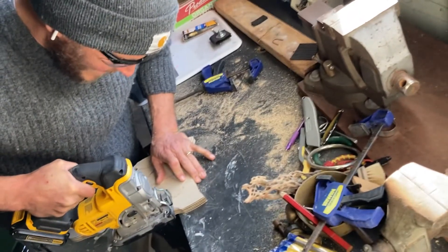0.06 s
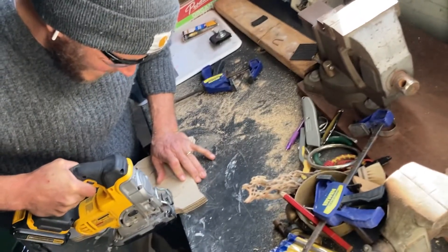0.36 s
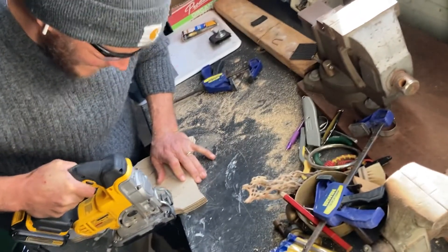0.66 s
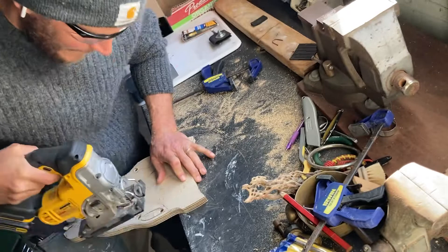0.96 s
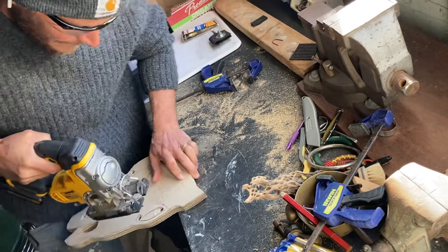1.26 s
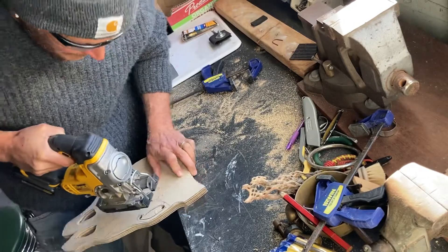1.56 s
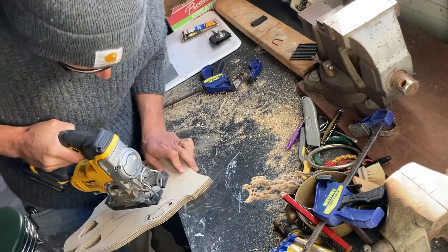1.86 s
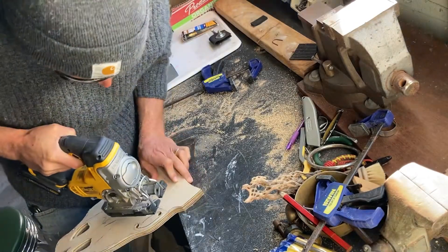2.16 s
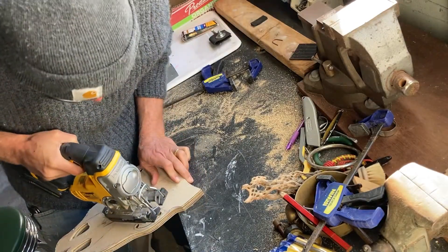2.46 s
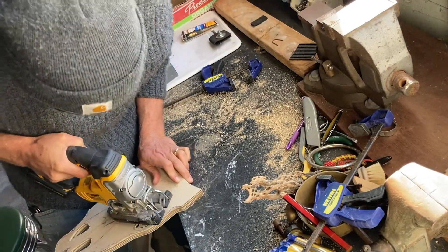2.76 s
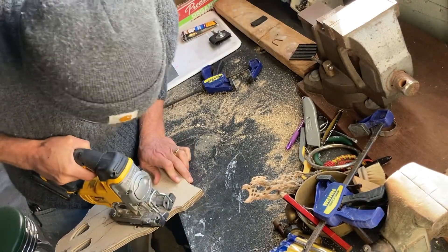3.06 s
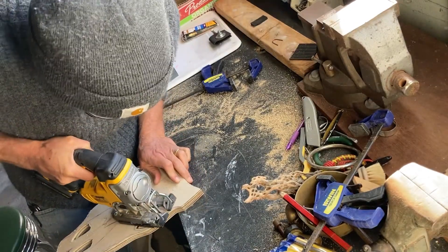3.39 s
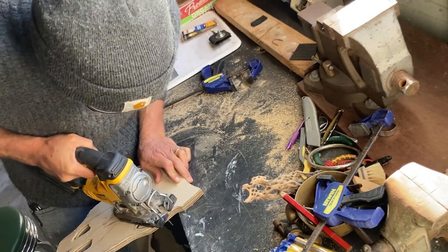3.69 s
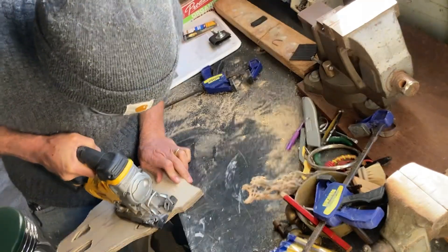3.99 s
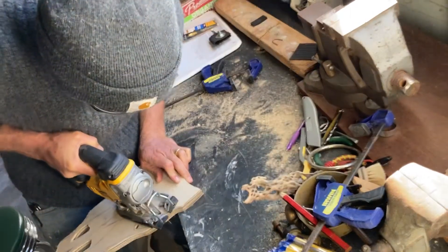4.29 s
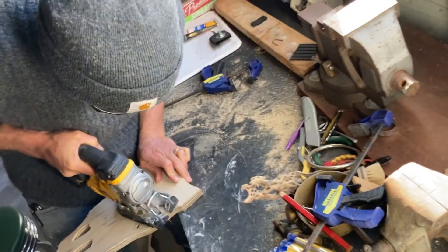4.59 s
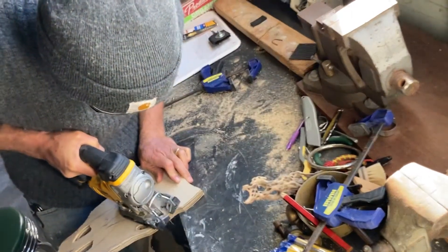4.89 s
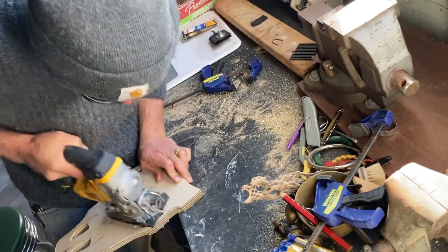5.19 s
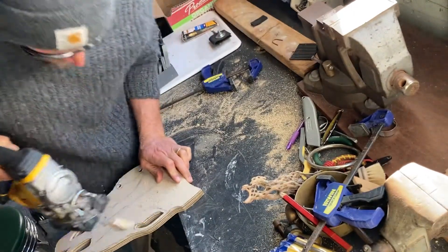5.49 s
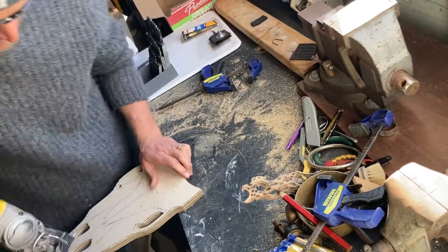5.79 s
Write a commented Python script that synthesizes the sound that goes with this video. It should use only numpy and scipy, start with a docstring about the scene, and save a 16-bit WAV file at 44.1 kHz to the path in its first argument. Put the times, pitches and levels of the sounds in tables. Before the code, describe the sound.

A handheld power jigsaw is already cutting a thin wooden board, close by in a small workshop: a rattling, rasping buzz with a sharp click at 0.5 seconds. It winds down from about 0.7 seconds. Between 1.1 and 2.4 seconds the saw slides over the board with faint, thin squeaks, soft rubbing and a small bump. A few light clicks come near 2.9 seconds. At 3.4 seconds the motor restarts with a thin, high whine, and the saw bumps and clacks on the board as it gathers speed. From about 3.9 seconds the blade bites for a second, louder cut, with a thudding vibration, motor hum and several sharp snags. Just after 5 seconds the saw is released and quickly coasts down. A light knock at 5.3 seconds and a few fainter taps and rubs follow, over a faint low room rumble.

```python
"""A handheld jigsaw makes two cuts in a thin board on a workbench, heard by a close microphone pair.
Its crank is a periodic source: each stroke jolts the board, rattles the gearbox and drags the teeth
through the wood, while the rotating parts hum. Between the cuts the saw is set down and slid over the
board with stick-slip squeaks; chopped current whines as the motor spins up again. A few light knocks
follow, over the low rumble of the small workshop."""
import sys
import numpy as np
from scipy import signal
from scipy.fft import rfft, irfft, next_fast_len
from scipy.io import wavfile
from scipy.ndimage import uniform_filter1d, map_coordinates

SR = 44100
rng = np.random.default_rng(int(sys.argv[2]) if len(sys.argv) > 2 else 0)


def transcribe(signal):
    """Save signal, clipped to [-1, 1], as a 16-bit WAV file at the path in sys.argv[1]."""
    frames = np.atleast_2d(signal).T
    limited = np.clip(frames, -1, 1)
    pcm = np.round(limited * 32767).astype(np.int16)
    wavfile.write(sys.argv[1], SR, pcm)


N = 261954


def amp(db):
    """Amplitude ratio of a level in decibels."""
    return 10 ** (np.asarray(db) / 20)

def unit(x):
    """Normalisation to rms 1 at the centre of the stereo image."""
    return x / np.sqrt(np.mean(np.atleast_2d(x).mean(0) ** 2) + 1e-20)

def along(points, hz):
    """Interpolation of (f/Hz, value) points on a logarithmic frequency axis."""
    f, v = np.transpose(points)
    return np.interp(np.log(hz + 1), np.log(f + 1), v)

def curves(rows):
    """Linear interpolation in time of each column after t/s."""
    s, *cols = np.transpose(rows)
    return [np.interp(np.arange(N) / SR, s, c) for c in cols]

def ramp(start_s, length_s):
    """Linear rise from 0 to 1, then held."""
    return np.clip((np.arange(N) / SR - start_s) / length_s, 0, 1)

def since(s):
    """Time elapsed after an instant, 0 before it."""
    return np.maximum(np.arange(N) / SR - s, 0)

def noise():
    """Two uncorrelated white noises."""
    return rng.standard_normal((2, N))

def wobble(rate):
    """Smooth random modulation with rate knots a second."""
    return map_coordinates(rng.standard_normal(int(N * rate / SR) + 4), [np.arange(N) * rate / SR])

def filtered(x, response):
    """Linear filtering: the spectrum times a frequency response."""
    m = next_fast_len(N + SR // 4)
    return irfft(rfft(x, m) * response(np.fft.rfftfreq(m, 1 / SR)), m)[..., :N]

def colour(x, spectrum, modes=()):
    """Spectral shaping by a broad envelope with resonance peaks on top."""
    def peaks_db(hz):
        return sum(db / (1 + (2 * (hz - centre) / width) ** 2) for centre, width, db in modes)
    return filtered(x, lambda hz: amp(along(spectrum, hz) + peaks_db(hz)))

def level_in(pair, low_hz, high_hz):
    """Normalisation of a pair to rms 1 within one band."""
    band = filtered(pair.mean(0), lambda hz: (hz > low_hz) & (hz < high_hz))
    return pair / np.std(band)


# Microphone pair: f/Hz, coherence, phase lead of left/rad, left minus right/dB
MIC_PAIR = [(100, .5, 0, -4), (300, .45, .6, 3.5), (700, .45, .7, 2), (1300, .3, 3.6, 5.5),
            (2400, .45, 3.8, 4), (3500, .65, 6.3, 3), (4500, .5, 7.2, 4), (5400, .6, 9.4, 2),
            (6400, .99, 6.28, 0), (7400, .99, 6.28, 0), (7900, .5, 5, 0), (8500, .998, 3.14, 0),
            (9500, .998, 3.14, 0), (10100, .65, 1.8, 0), (10900, .99, 0, 0), (11900, .98, 0, 0),
            (12500, .55, -2.2, 0), (13200, .998, -3.14, 0), (14300, .998, -3.14, 0), (15100, .99, -6.28, 0)]

def at_mics(pair):
    """Partial coherence: two signals mix into left and right with differences of phase and level."""
    def response(hz, sign):
        coherence, lead, balance_db = [along(np.array(MIC_PAIR)[:, [0, k]], hz) for k in (1, 2, 3)]
        turn = np.arccos(np.clip(coherence, 0, 1)) / 2
        mix = np.array([np.cos(turn), sign * np.sin(turn)])
        return mix * np.exp(.5j * sign * lead) * amp(sign * balance_db / 2)
    return np.array([filtered(pair, lambda hz: response(hz, sign)).sum(0) for sign in (1, -1)])


# Reverberation time of the workshop: f/Hz, T60/s
WORKSHOP = [(150, .35), (1000, 0.6), (4000, 0.27), (12000, .25)]

def room(pair, wet_db):
    """Reverberation: convolution with a short, exponentially decaying noise tail."""
    hz, t, spectra = signal.stft(rng.standard_normal((2, SR // 2)), SR, nperseg=256)
    tail = signal.istft(spectra * amp(-60 * t / along(WORKSHOP, hz)[:, None]), SR, nperseg=256)[1]
    tail = np.pad(tail / np.linalg.norm(tail[0]), ((0, 0), (150, 0)))  # reflections arrive later
    return pair + amp(wet_db) * signal.fftconvolve(pair, tail, axes=1)[:, :N]


# Spectrum of the shaken board: f/Hz, relative level/dB
THUD_SPECTRUM = [(30, -20), (60, -16), (95, 0), (135, -6), (185, 3), (260, -0.5), (340, 0), (450, -4.5),
                 (800, -19.5), (3000, -58.5)]

def thuds(crank, scatter_db, decay):
    """Impulsive excitation: each reversal of the blade jolts the board, decaying over the half stroke."""
    half = 2 * crank
    size = amp(scatter_db * rng.standard_normal(int(half[-1]) + 1))[half.astype(int)]
    jolt = size * np.exp(-decay * (half % 1))
    return colour(room(noise() * jolt, wet_db=-8), THUD_SPECTRUM)


def clatter(crank, swing_db, scatter_db, slop, loose, count=48):
    """Periodic impacts: gear teeth and plunger strike at set crank angles, hardest at the reversals."""
    angle = rng.random(count)
    turns = np.arange(int(crank[-1]))[:, None] + angle
    turns = turns + slop * rng.standard_normal(turns.shape)
    size = amp(swing_db * np.cos(4 * np.pi * angle) + scatter_db * rng.standard_normal(turns.shape))
    when = np.interp(turns, crank, np.arange(N)).astype(int).ravel()
    strikes = [np.bincount(when, (size * rng.choice([-1, 1], count)).ravel(), N) for _ in range(2)]
    strikes = unit(np.array(strikes) / np.sqrt(np.gradient(crank)))
    # the board chatters freely under the shoe
    chatter = unit(noise() * amp(swing_db * np.cos(4 * np.pi * crank) + scatter_db * wobble(900)))
    return room(strikes + loose * chatter, wet_db=-5)


# Spectrum of gearbox and board: f/Hz, relative level/dB
HOUSING_SPECTRUM = [(40, -41.5), (120, -25), (230, -10.5), (400, 0.5), (700, -2.5), (1000, 1), (2200, 0),
                    (3000, -5), (4500, -7.5), (6000, -12.5), (10000, -35.5), (16000, -49)]
# Their resonances: f/Hz, bandwidth/Hz, peak in first cut/dB, peak in second cut/dB
HOUSING_MODES = [(621, 24, 6, 6), (753, 45, 1.5, 8.5), (937, 70, 2.5, 0), (1256.6, 38, 2.5, 12),
                 (1390, 74, -2, -3.5), (1550, 80, 5, 2), (1725, 70, 4, 7), (1850, 45, 0, 8),
                 (1920, 57, -0.5, 2), (2200, 300, 1, -2.5), (3360, 150, 5, 3), (3750, 200, 6, -2),
                 (4540, 220, 7.5, 2.5)]

def gearbox(blows, cut, lifted):
    """Source and filter: the blows excite modes that depend on where the saw stands, until it lifts."""
    modes = [(hz, width, levels[cut]) for hz, width, *levels in HOUSING_MODES]
    on_board = level_in(colour(blows, HOUSING_SPECTRUM, modes), 500, 2500)
    off_board = level_in(colour(blows, HOUSING_SPECTRUM), 500, 2500)
    return (1 - lifted) * on_board + lifted * off_board


# Spectrum of teeth in wood: f/Hz, relative level/dB
TEETH_SPECTRUM = [(800, -28.5), (2500, -0.5), (3700, 4), (4900, -0.5), (5900, -5), (6600, -0.5), (7650, 0),
                  (7950, -3.5), (8400, 1.5), (9700, -0.5), (11000, -0.5), (13000, -2.5), (14400, -13.5),
                  (15600, -8.5)]
# Resonances of blade and shoe: f/Hz, bandwidth/Hz, peak/dB
BLADE_MODES = [(3370, 220, 0), (3620, 110, -3), (4000, 180, -3), (4510, 170, 3), (4960, 220, 2.5),
               (5560, 250, 1.5), (6580, 200, 4), (7660, 160, 3.5), (8500, 220, 1), (10230, 250, 4.5),
               (11100, 200, 2.5)]

def rasp(crank, swing_db=1.9, stroke_db=.7, tooth_db=6, splinter_db=.7, grip_db=1, teeth=10, count=22):
    """Amplitude-modulated noise: the teeth tear fibres in two abrupt rushes per crank turn."""
    half = 2 * crank + .03 * wobble(120)
    rush = np.tanh(3 * (np.sin(2 * np.pi * half) + .25))
    force = rng.standard_normal(int(2 * crank[-1]) + 1)[(2 * crank).astype(int)]
    tooth = teeth / 2 * np.cos(np.pi * ((half + .25) % 1)) % 1  # catch and release, fastest mid-stroke
    # the same stretches of blade grip hardest on every turn, so the rasp buzzes
    grip = np.interp(crank, np.arange(count) / count, unit(rng.standard_normal(count)), period=1)
    rush_db = swing_db * rush + stroke_db * force * (rush + 1) / 2
    bite = amp(rush_db + tooth_db * tooth + grip_db * grip + splinter_db * wobble(330))
    return colour(room(noise() * bite, wet_db=-10), TEETH_SPECTRUM, BLADE_MODES)


# Crank, motor and gear mesh: f/stroke rate, relative level in first cut/dB, in second cut/dB
HUM_PARTIALS = [(2, -56, -42), (3, -53, -49.5), (4, -50, -42), (5, -58, -46.5), (7, -44.5, -37.5),
                (8, -51.5, -47.5), (9, -43, -52), (11, -52, -47), (13, -47, -50), (14.2, -44.5, -40.5),
                (16, -45.5, -39.5), (19, -51, -47), (25, -45, -48), (28.4, -45, -42), (29, -52.5, -37),
                (35, -45, -50), (39, -48, -50), (42, -57, -36.5), (44, -52.5, -42), (63, -47, -51),
                (75, -47, -43), (77, -41, -35.5), (79.2, -42, -39), (85.7, -42, -50), (92.3, -47, -42.5),
                (94.3, -52, -41.5), (102.8, -45, -40), (105.6, -43, -48)]

def hum(crank, cut, waver_db=2.2, shake=.06, reflected_db=-5):
    """Rotational orders: each wavers with the hand's pressure; gear play blurs the high ones most."""
    out = np.zeros((2, N))
    sway, play = [wobble(25) for _ in range(5)], [wobble(60) for _ in range(5)]
    for multiple, *levels in HUM_PARTIALS:
        a, b = rng.permutation(len(sway))[:2]
        phase = 2 * np.pi * (multiple * crank + rng.random()) + shake * np.sqrt(multiple) * play[b]
        peak = amp(levels[cut] + waver_db * sway[a]) * np.sqrt(2)
        out[0] += peak * np.sin(phase)
        out[1] += peak * amp(reflected_db) * np.cos(phase + .5 * sway[b])  # reflection off the bench
    return out


# Rattles of board, shoe and blade: peak t/s, rise/s, fall/s, f/Hz, bandwidth/Hz, level/dB
RATTLES = [(.48, .14, .14, 483, 50, -36.5), (.44, .25, .17, 925, 90, -45), (.15, .06, .08, 1545, 70, -38),
           (.52, .2, .2, 1545, 70, -46), (.5, .16, .3, 370, 70, -43), (.25, .35, .2, 3400, 260, -35),
           (.512, .03, .03, 3400, 260, -31), (.7, .05, .04, 3500, 260, -33), (3.96, .08, .1, 555, 70, -40),
           (4.01, .05, .08, 300, 60, -38), (4.17, .17, .18, 1262, 50, -31), (4.33, .31, .5, 393, 31, -26),
           (4.47, .2, .2, 735, 90, -42), (4.3, .35, .28, 3340, 130, -32), (4.74, .16, .26, 1262, 40, -37),
           (4.86, .16, .18, 397, 31, -37), (4.99, .1, .09, 3340, 130, -35)]

def rattles(crank, scatter_db=2.4, slop=.0013, reflected_db=-6, fade_db=10):
    """Forced resonance: one uneven tap per turn drives modes that swell and fade as the saw moves on."""
    turns = np.arange(int(crank[-1]))
    chance = rng.standard_normal((len(turns), 2))
    when = np.interp(turns + slop * chance[:, 0], crank, np.arange(N)).astype(int)
    taps = np.bincount(when, amp(scatter_db * chance[:, 1]), N)
    t, out = np.arange(N) / SR, np.zeros(N)
    for s, rise_s, fall_s, hz, width, db in RATTLES:
        ring = filtered(taps, lambda f: (1j * f * width / (hz ** 2 - f ** 2 + 1j * f * width)) ** 2)
        swell = amp(-fade_db * np.maximum((s - t) / rise_s, (t - s) / fall_s) ** 2)
        out += amp(db) * swell * ring / np.sqrt(np.average(ring ** 2, weights=swell ** 2))
    reflection = amp(reflected_db) * filtered(out, lambda f: 1j)  # off the bench, in quadrature
    return np.array([out, reflection])


# Spectrum of the blade out of the wood: f/Hz, relative level/dB
FREE_BLADE_SPECTRUM = [(800, -28), (2500, 0), (3500, 4.5), (5000, -3.5), (6000, -6), (7500, -2.5),
                       (8600, 4), (9600, 4), (11000, 2.5), (13000, -5), (15600, -8)]

def free_blade(crank):
    """Periodic impacts: the unloaded blade ticks in its guide."""
    ticks = clatter(crank, swing_db=3.3, scatter_db=2.6, slop=.01, loose=.8)
    return colour(ticks, FREE_BLADE_SPECTRUM)


def motor_speed(pull_s, release_s, spin_up_s=.76, coast_s=.28):
    """Inertia: the share of full speed rises softly, holds, then decays exponentially."""
    return np.sin(np.pi / 2 * ramp(pull_s, spin_up_s)) * np.exp(-since(release_s) / coast_s)


# Layers of the saw: gain/dB, speed exponent, drop out of the wood/dB, fade after release/(dB/s)
THUD_LAW, CLATTER_LAW = (-1.8, 1.6, 4, 65), (-6.8, 1.8, 3.6, 58)
RASP_LAW, HUM_LAW = (.1, 1.5, 10.7, 105), (1.7, 7, 3, 40)

def drive(law, speed, biting, released_s):
    """Power law: a layer's gain grows with speed, drops out of the wood and fades without power."""
    level_db, exponent, free_db, fade_db_per_s = law
    return amp(level_db - free_db * (1 - biting) - fade_db_per_s * released_s) * speed ** exponent


# Cuts: trigger pulled t/s, blade bites t/s, released t/s, board boom/dB, fade on withdrawal/(dB/s)
CUTS = [(-1, -.5, .736, -3, 22), (3.4, 3.85, 5.065, .5, 0)]
# The hand, one list per cut: t/s, pressure as thud gain/dB, feed as rasp and clatter gain/dB
HAND_EFFORT = [
    [(0.02, -40, -26), (0.378, -41, -25), (0.408, -36, -26), (0.518, -38, -25), (0.66, -46, -26.5),
     (0.74, -45, -27), (.79, -54, -27)],
    [(3.9, -37, -25), (4.17, -28, -22), (4.478, -28, -22), (4.552, -30, -26), (4.94, -35, -26),
     (5.03, -40, -26), (5.06, -39, -29)],
]

def jigsaw(stroke_hz=43.8, creep=.05, bite_fade_s=.04, let_go_s=.07, steadied_db=9.2, load_share=.85):
    """Forced vibration: one crank drives all layers; near full speed the board steadies and hum grows."""
    speeds = [motor_speed(pull_s, release_s) for pull_s, _, release_s, *_ in CUTS]
    rate_hz = stroke_hz * np.maximum(np.max(speeds, 0), creep) * (1 + .003 * wobble(14))
    crank = np.cumsum(rate_hz) / SR  # angle in turns
    board = level_in(at_mics(thuds(crank, scatter_db=1.5, decay=1.6)), 160, 500)
    blows = at_mics(clatter(crank, swing_db=2.5, scatter_db=2.6, slop=.0012, loose=1.15))
    in_wood = unit(at_mics(rasp(crank)))
    in_air = unit(at_mics(free_blade(crank)))
    rattle = rattles(crank)
    noisy, tonal = np.zeros((2, N)), np.zeros((2, N))
    for cut, (_, bite_s, release_s, boom_db, away_db_per_s) in enumerate(CUTS):
        press_db, feed_db = curves(HAND_EFFORT[cut])
        lifted = ramp(release_s, let_go_s)
        biting = ramp(bite_s, bite_fade_s) - lifted
        away = amp(-away_db_per_s * since(release_s))
        thudding, clattering, rasping, humming = [
            away * drive(law, speeds[cut], biting, since(release_s))
            for law in (THUD_LAW, CLATTER_LAW, RASP_LAW, HUM_LAW)]
        blade = np.sqrt(abs(biting)) * in_wood + np.sqrt(abs(1 - biting)) * in_air
        noisy += amp(press_db + boom_db - steadied_db * humming / humming.max()) * thudding * board
        noisy += amp(feed_db) * (clattering * gearbox(blows, cut, lifted) + rasping * blade)
        load = amp(load_share * (press_db - press_db.max()))
        tonal += biting * rattle + humming * load * hum(crank, cut)
    return (noisy + at_mics(tonal)) * ramp(0, .002)


# Envelope of the rumble: t/s, relative level/dB
RUMBLE_ENVELOPE = [(0, -56), (.85, -60), (1.3, -53), (2.7, -59), (5.3, -61), (5.6, -71), (5.75, -62.5),
                   (5.94, -64)]
# Its spectrum: f/Hz, relative level/dB
RUMBLE_SPECTRUM = [(20, -18), (45, -5.5), (75, 0.5), (100, 2), (140, -10.5), (300, -13.5), (600, -31.5),
                   (2000, -50.5), (16000, -77)]

def rumble(hiss_db=-93):
    """Ambient noise: bench and room rumble softly under a faint hiss."""
    hiss = unit(colour(noise(), [(300, 0), (4000, -12), (16000, -26)]))
    low = unit(at_mics(colour(noise(), RUMBLE_SPECTRUM)))
    return amp(curves(RUMBLE_ENVELOPE)[0] - 3) * low + amp(hiss_db) * hiss


# Contacts of saw, board and bench, and blade snags: t/s, click gain/dB, ring gain/dB, click T60/s
KNOCKS = [(.509, -17, -52, .01), (.523, -19, -52, .01), (1.385, -70, -52, .03), (2.859, -47, -70, .025),
          (2.902, -46.5, -79, 0.014), (2.92, -49.5, -55, 0.07), (3.09, -66, -73, .015),
          (3.181, -64, -85, .015), (3.465, -43, -60, .04), (3.912, -20, -42, .012),
          (4.06, -12.5, -36, .008), (4.073, -16, -38, .008), (4.326, -15, -38, .008),
          (4.511, -17, -38, .012), (5.259, -43.5, -56, 0.069), (5.272, -50, -56, .04),
          (5.335, -63, -60, .05), (5.534, -72, -80.5, .08), (5.79, -72, -76, .04)]
# Modes of the board: f/Hz, relative level/dB, T60/s
BOARD_MODES = [(195, 0, 0.18), (310, -6.5, .09), (520, -8.5, .07), (930, -1.5, 0.06), (1750, -12.5, .05)]
# Spectrum of a click: f/Hz, relative level/dB
CLICK_SPECTRUM = [(300, -5.5), (1500, 1), (3500, -0.5), (6000, -9.5), (11000, -4.5), (16000, -8)]

def knocks(attack_s=.003):
    """Impact and free vibration: each contact is a broadband click plus the board's damped modes."""
    t = np.arange(SR // 3) / SR
    attack = 1 - np.exp(-t / attack_s)
    clicks, rings = np.zeros((2, 2, N + SR))
    for s, click_db, ring_db, click_t60 in KNOCKS:
        span = slice(round(s * SR), round(s * SR) + len(t))
        clicks[:, span] += amp(click_db + 2.5 - 60 * t / click_t60) * rng.standard_normal((2, len(t)))
        for hz, db, t60 in BOARD_MODES:
            decay = amp(ring_db + db + rng.normal(0, 2, (2, 1)) - 60 * t / t60)
            rings[:, span] += attack * decay * np.sin(2 * np.pi * hz * t)
    return at_mics(room(colour(clicks[:, :N], CLICK_SPECTRUM) + rings[:, :N], wet_db=-8.5))


# Squeaks of the shoe on the board: t/s, duration/s, f/Hz, glide/Hz, level/dB
SQUEAKS = [(1.094, .034, 2150, 40, -57), (1.133, .065, 2550, 60, -56), (1.203, .036, 2150, -80, -60),
           (1.34, .055, 2540, -60, -62), (1.33, .12, 2140, -60, -58.5), (1.485, .04, 2510, -30, -66),
           (1.46, .07, 2130, -30, -56), (1.51, .11, 2110, -40, -61), (1.62, .11, 2090, -20, -71),
           (1.82, .08, 2600, 150, -71), (1.83, .07, 1780, 300, -71), (1.89, .07, 2065, 40, -59),
           (1.94, .05, 2095, 40, -48.5), (1.99, .08, 2130, 20, -66), (2.06, .16, 2230, -90, -63.5),
           (2.08, .26, 2550, -160, -70.5), (2.19, .15, 2105, -40, -56), (2.12, .3, 7000, -600, -81),
           (2.33, .11, 2095, -20, -71)]

def squeaks(rough=.014, flicker_db=2.3, scratch=.22, lower_db=-12, upper_db=-28):
    """Stick-slip oscillation: thin, scratchy glides with weak partials an octave below and above."""
    tone = np.zeros(N)
    waver, flicker, drift = 1 + rough * wobble(400), flicker_db * wobble(70), wobble(200)
    for s, length_s, hz, glide_hz, db in SQUEAKS:
        span = slice(round(s * SR), round((s + length_s) * SR))
        progress = np.linspace(0, 1, len(tone[span]))
        phase = 2 * np.pi * np.cumsum((hz + glide_hz * (progress - .5)) * waver[span]) / SR
        octaves = amp(lower_db) * np.sin(phase / 2 + drift[span]) + amp(upper_db) * np.sin(2 * phase)
        tone[span] += amp(db + flicker[span]) * np.sin(np.pi * progress) * (np.sin(phase) + octaves)
    tone = tone * (1 + scratch * wobble(1100))
    return room(np.array([tone, tone]), wet_db=-4) * amp([[2], [-1]])


# Pushes of saw over board and board over bench: peak t/s, rise/s, fall/s, rub/dB, scrape/dB, hiss/dB
SLIDES = [(1.28, .12, .2, -68, -68, -82), (1.41, .08, .14, -66, -67, -59), (1.54, .4, .35, -64.5, -71, -79),
          (1.8, .5, .5, -67, -95, -80), (2.05, .2, .12, -60.5, -61.5, -69), (2.2, .4, .4, -65, -84, -82),
          (2.55, .9, 1.8, -68, -93, -108), (2.85, .3, .25, -73, -78, -84), (2.97, .05, .06, -78, -76, -72),
          (3.24, .06, .3, -81, -89, -89), (5.55, .04, .3, -82, -84, -79), (5.83, .7, .6, -77, -96, -108)]

def sliding(fade_db=20):
    """Friction noise: on dusty wood a dull rub, a scrape and a fine hiss swell and fade with each push."""
    grain = amp(2 * wobble(300) + .84 * wobble(30))
    rub = [(100, -13), (300, 2.5), (600, -2.5), (1100, 2.5), (1900, -7.5), (2700, -16.5), (8000, -55)]
    scrape = [(1200, -25), (2400, -3.5), (3200, -10.5), (4000, -4.5), (5000, -15.5), (10000, -33.5)]
    hiss = [(3000, -23), (5500, -1), (7000, 3), (11500, 3), (13500, -8), (16000, -5.5)]
    bands = [unit(at_mics(colour(noise() * grain, spectrum))) for spectrum in (rub, scrape, hiss)]
    t, power = np.arange(N) / SR, np.zeros((len(bands), N))
    for s, rise_s, fall_s, *levels_db in SLIDES:
        push = amp(-fade_db * np.maximum((s - t) / rise_s, (t - s) / fall_s))
        power += np.outer(amp(levels_db), push) ** 2
    return sum(gain * band for gain, band in zip(np.sqrt(power), bands))


# Bumps of the shoe, set down or gathering speed: t/s, boom level/dB, clack level/dB, clack centre f/Hz
BUMPS = [(1.289, -55, -42.5, 180), (3.59, -55, -34, 560), (3.607, -46, -35, 180), (3.645, -34, -42, 1100),
         (3.711, -48, -31, 1000), (3.742, -29, -34, 390), (3.785, -36, -26, 1300), (3.823, -26.5, -35, 390),
         (3.846, -42, -28, 1250), (3.868, -40, -27, 280), (3.905, -35, -26, 750), (3.985, -45, -25, 390)]
# Modes of the board under the shoe: f/Hz, relative level/dB, T60/s
CLACK_MODES = [(172, 0, .2), (385, 0, .11), (738, 0, .12), (995, -1, .08), (1275, 0, .12)]

def bumps(boom_hz=88, boom_t60_s=.16, boom_attack_s=.008, clack_attack_s=.0015, db_per_octave=9):
    """Modal response: each bump rings the bench's low mode and the board's modes near a centre pitch."""
    t, out = np.arange(SR // 3) / SR, np.zeros((2, N))
    for s, boom_db, clack_db, centre_hz in BUMPS:
        boom = amp(boom_db - 60 * t / boom_t60_s) * np.sin(2 * np.pi * boom_hz * t)
        clack = np.zeros(len(t))
        for hz, db, t60 in CLACK_MODES:
            mode_db = clack_db + db - db_per_octave * abs(np.log2(hz / centre_hz))
            clack += amp(mode_db - 60 * t / t60) * np.sin(2 * np.pi * hz * rng.normal(1, .015) * t)
        bump = boom * (1 - np.exp(-t / boom_attack_s)) + clack * (1 - np.exp(-t / clack_attack_s))
        out[0, round(s * SR):][:len(t)] += bump
    return at_mics(room(out, wet_db=-10))


def controller(whine_hz=3928, until_speed=.8, growth_db=10.5, ripple_db=.8, kick_hz=3500, kick_t60_s=.15):
    """Switching noise: chopped current whines, mostly in odd harmonics, as the second cut spins up."""
    pull_s, _, release_s, *_ = CUTS[-1]
    speed, start_s = motor_speed(pull_s, release_s), pull_s + .01
    spinning_up = np.maximum.accumulate(speed) < until_speed
    chopping = uniform_filter1d(1. * spinning_up, size=600) * ramp(start_s, .025)
    phase = 2 * np.pi * whine_hz * np.arange(N) / SR + .13 * wobble(700)  # roughened by the brushes
    whine = sum(amp(db) * np.sin(k * phase) for k, db in enumerate([4.5, -20, -12.5, -25], 1))
    whine *= amp(-49.5 + growth_db * speed + ripple_db * wobble(200)) * chopping
    # the first surge of current rings the motor's housing
    kick = amp(-64 - 60 * since(start_s) / kick_t60_s) * np.sin(2 * np.pi * kick_hz * since(start_s))
    return at_mics(np.array([whine + kick, np.zeros(N)]))


def scene():
    """Superposition of saw, handling and background."""
    return jigsaw() + controller() + squeaks() + sliding() + knocks() + bumps() + rumble()


def record(dry):
    """Band limiting: a steep low-pass removes the highest treble."""
    cutoff_hz = 15850
    return filtered(dry, lambda hz: 1 / (1 + (hz / cutoff_hz) ** 200))


dry = scene()
out = record(dry)
transcribe(out)
```